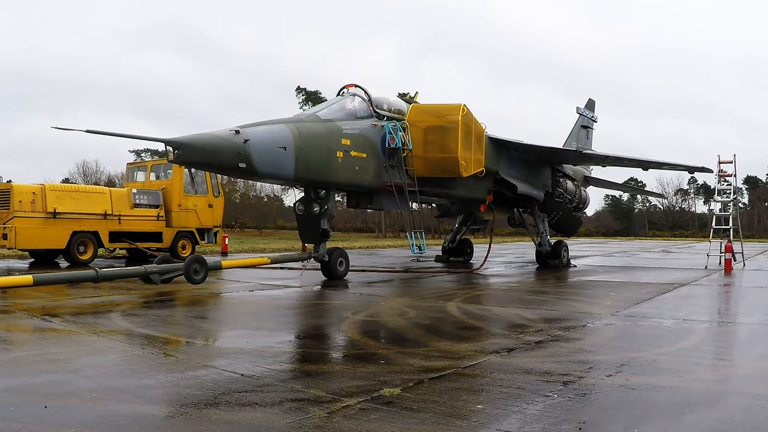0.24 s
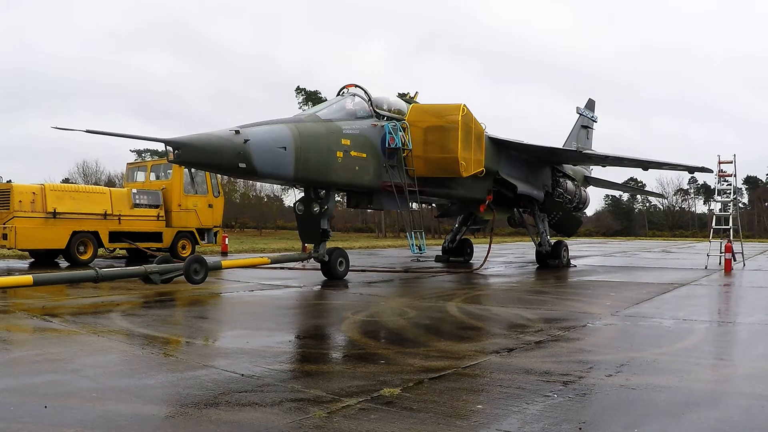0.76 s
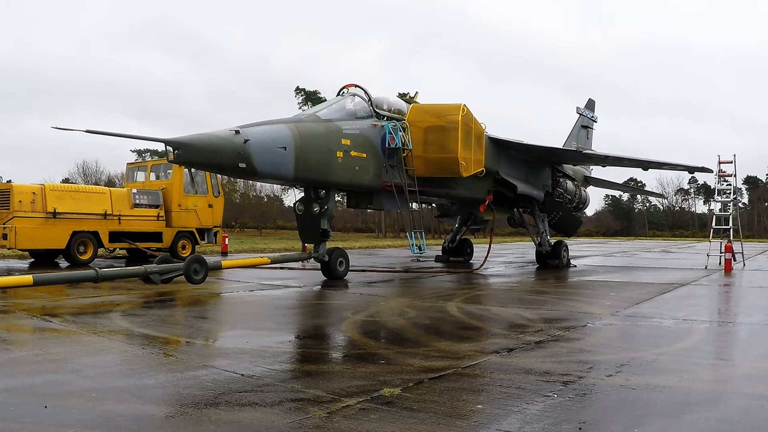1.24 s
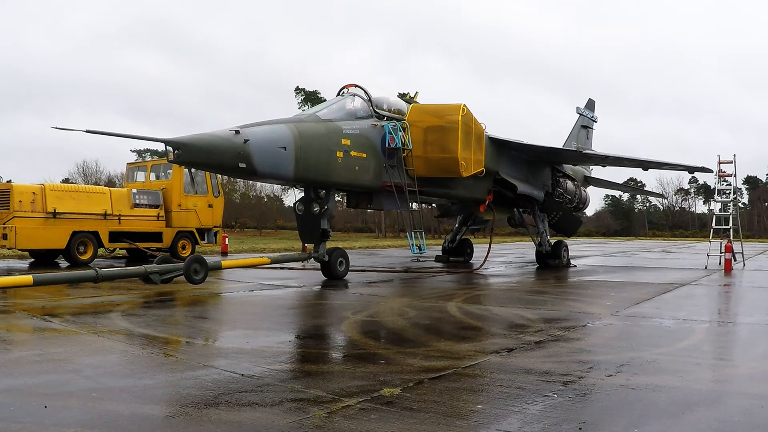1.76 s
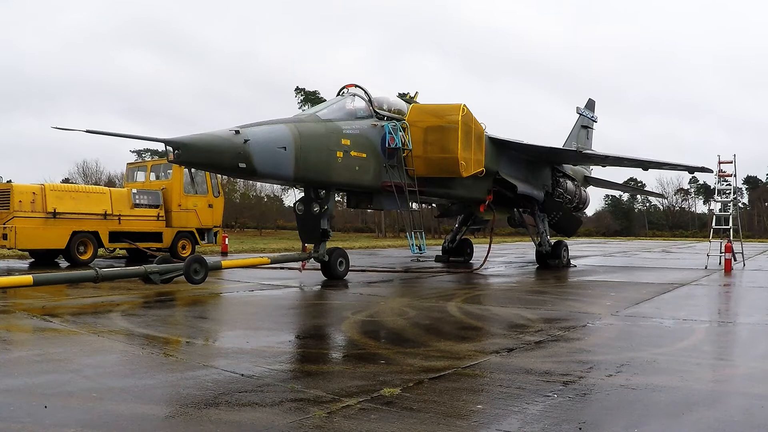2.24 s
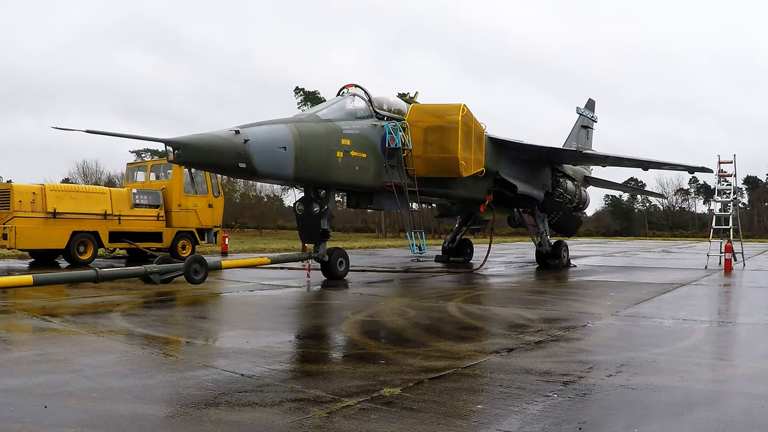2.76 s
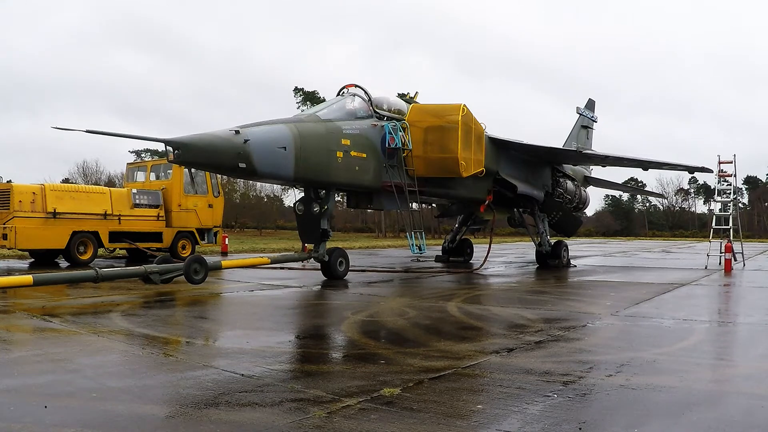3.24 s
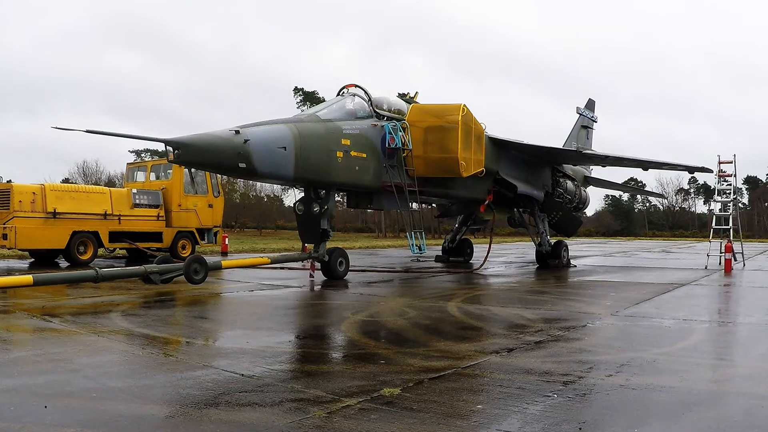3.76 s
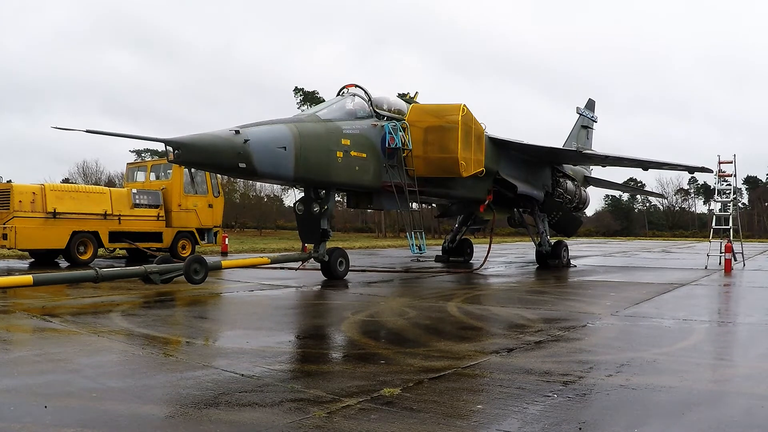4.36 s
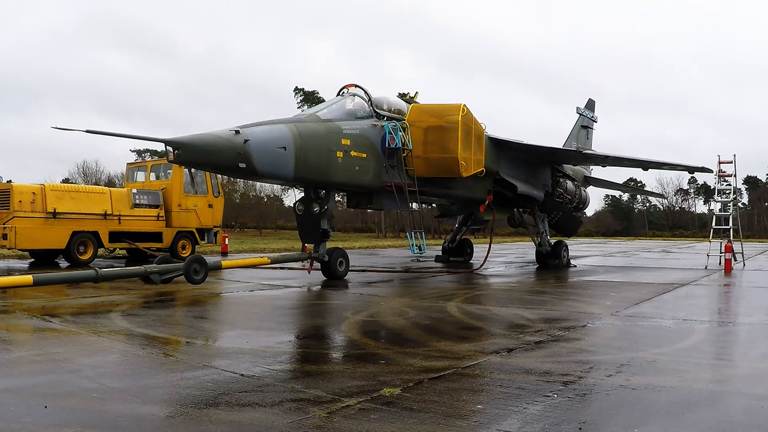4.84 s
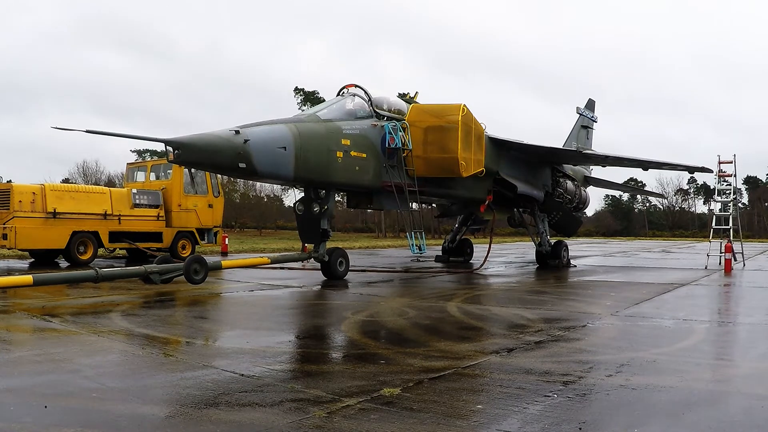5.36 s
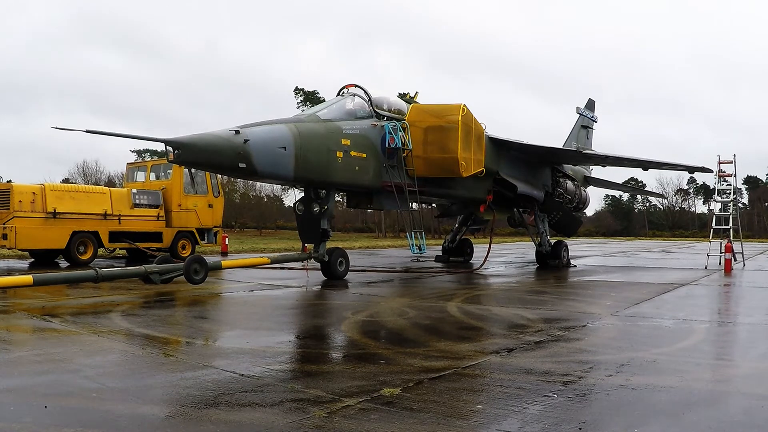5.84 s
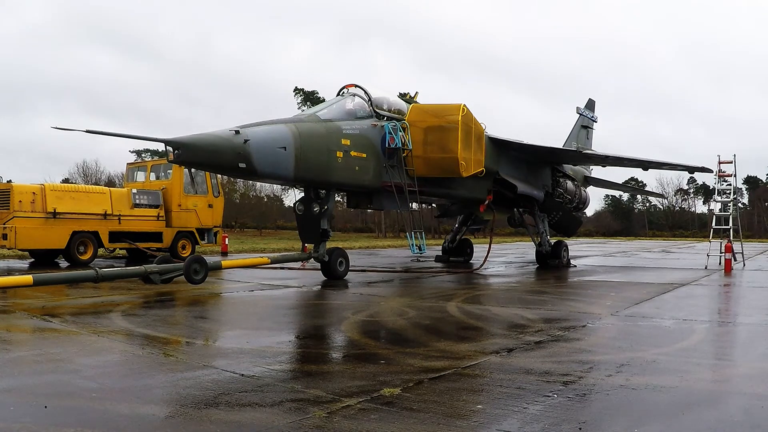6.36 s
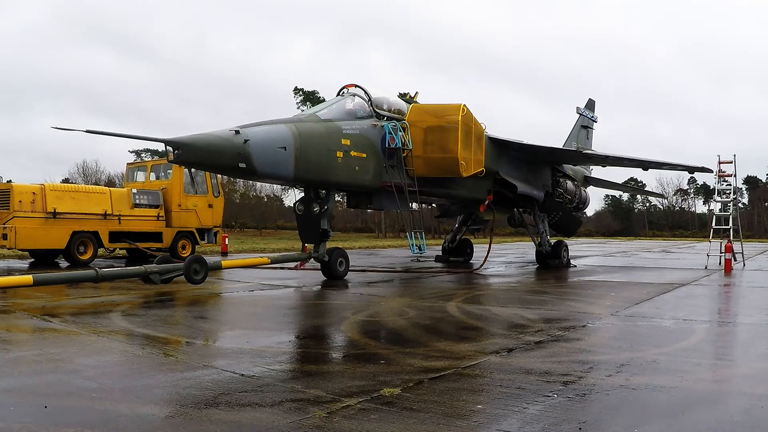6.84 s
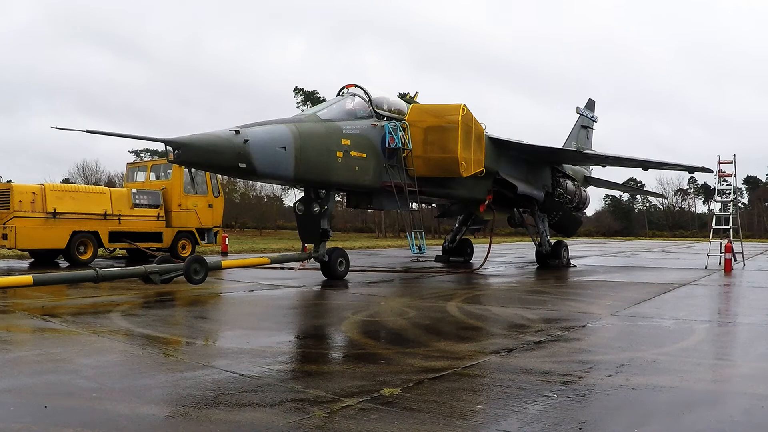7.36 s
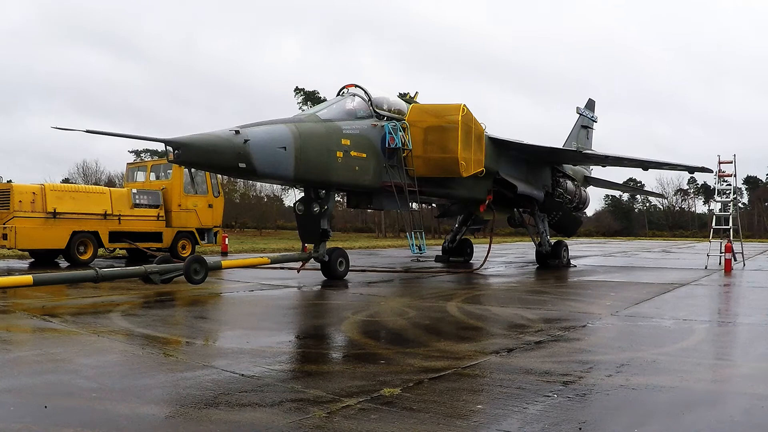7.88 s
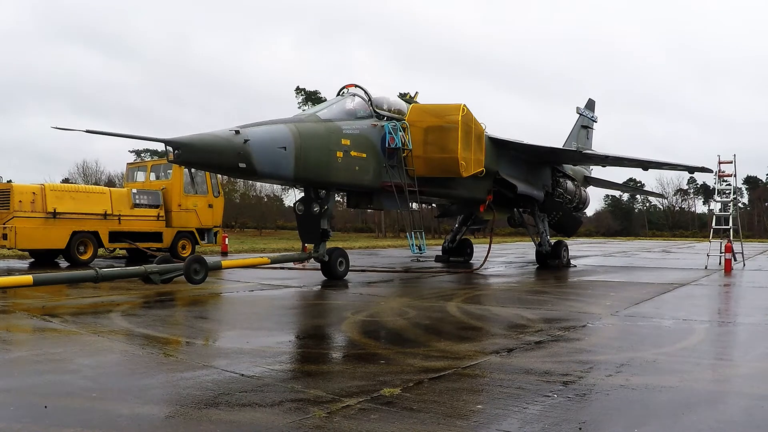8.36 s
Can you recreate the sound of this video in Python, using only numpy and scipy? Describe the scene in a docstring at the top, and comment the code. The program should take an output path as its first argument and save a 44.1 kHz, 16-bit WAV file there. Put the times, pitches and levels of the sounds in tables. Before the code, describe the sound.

A parked jet fighter starts its engine on open concrete. A shrill whistle, already high, climbs with quick flutters and flares over rushing air and a steady diesel ground power hum. After about three seconds deep booms surge irregularly; the whistle levels briefly, then rises faster as a broad roar swells. One fixed outdoor microphone, mono, little echo.

```python
"""Jet engine start on the apron

A jet engine winds up on open concrete while a diesel ground power unit runs beside it.
Blade rows whistle at fixed multiples of the shaft speed, fading in the moving air.
Flame noise drives a low boom in the jet pipe, with rumble below, flutter above and brief surges.
Air rushes through the ducts, coloured by resonances, and a roar grows over it."""
import sys
import numpy as np
from scipy import signal
from scipy.fft import rfft, irfft, next_fast_len
from scipy.io import wavfile

SR = 44100
rng = np.random.default_rng(int(sys.argv[2]) if len(sys.argv) > 2 else 0)


def digitize_waveform(pressure):
    """Quantize a signal to 16-bit integers and store it at the path in sys.argv[1].

    Rows of a 2-D input are taken as channels; values are limited to [-1, 1].
    """
    field = np.atleast_2d(pressure).T
    bounded = np.clip(field, -1, 1)
    quanta = np.round(bounded * 32767).astype(np.int16)
    wavfile.write(sys.argv[1], SR, quanta)


N = 379701  # samples


def undb(db):
    """Decibels to amplitude gain."""
    return 10 ** (np.asarray(db) / 20)


def curves(table):
    """The columns of a table, after its time column, as one value a sample."""
    s, *columns = np.transpose(table)
    return [np.interp(np.arange(N) / SR, s, c) for c in columns]


def noise(gain):
    """Noise of unit power per Hz, weighted by gain(Hz)."""
    size = next_fast_len(N, real=True)
    hz = np.arange(size // 2 + 1) * SR / size
    spectrum = rfft(rng.standard_normal(size)) * gain(hz)
    return irfft(spectrum, size)[:N] * np.sqrt(SR / 2)


def walk(rate):
    """Smooth random curve of about unit spread, up to rate changes a second."""
    count = int(N / SR * rate * 2) + 4
    steps = np.random.default_rng(rng.integers(2 ** 31)).standard_normal(count)
    smooth = signal.resample(steps, count * 8)
    # two steps per change, eight points per step
    return np.interp(np.arange(N) / SR * rate * 16, np.arange(len(smooth)), smooth)


def coloured(spectrum, resonances=()):
    """Noise with a broad spectrum and bell-shaped peaks and hollows on it."""
    points, db = np.transpose(spectrum)

    def gain(hz):
        broad_db = np.interp(np.log(hz + 1), np.log(points), db)
        bells_db = sum(d * .5 ** ((2 * (hz - f) / w) ** 2) for f, w, d in resonances)
        return undb(broad_db + bells_db)
    return noise(gain)


def turn(hz):
    """Unit phasor that follows a pitch curve."""
    return np.exp(2j * np.pi * np.cumsum(hz) / SR)


def scatter(width_hz, slope):
    """Complex envelope of unit power that spreads a tone into skirts."""
    a, b = (noise(lambda hz: (1 + (hz / width_hz) ** 2) ** (-slope / 2)) for _ in range(2))
    return (a / a.std() + 1j * b / b.std()) / np.sqrt(2)


def tone(hz, envelope):
    """A tone with the rms of its complex envelope."""
    return np.sqrt(2) * np.real(turn(hz) * envelope)


def swells(events, attack_s, release_s):
    """Gain of (start, length, dB) events that each swell up to the start, hold and die away."""
    t = np.arange(N) / SR
    gains = []
    for start, length, db in events:
        rise = np.minimum(t - start, 0) / attack_s
        fall = np.maximum(t - start - length, 0) / release_s
        gains.append(undb(db) * np.exp(rise - fall))
    return np.max(gains, axis=0)


def power_unit():
    """A diesel hums on near-steady multiples of its cycle; generator and turbocharger sing above it."""
    # strong partials of the diesel: multiple of the cycle rate, level/dB
    diesel_partials = [(2, -50), (3, -63), (4, -62), (5, -65), (6, -49.5), (7, -55), (8, -48.5), (9, -55.5),
                       (11, -62), (12, -50), (14, -62.5), (15, -62.5), (16, -65), (20, -59.5), (21, -62),
                       (22, -56.5), (24, -68), (25, -63), (28, -66.5), (30, -69), (32, -62), (33, -66),
                       (38, -68)]
    # generator and turbocharger tones: f/Hz, level/dB, pitch wander/Hz
    singing_tones = [(725, -60.5, .4), (1449, -58.5, 1.5), (2292, -56, 14), (7538, -52, 8)]
    cycle_hz = 20.46
    cycle = turn(cycle_hz * (1 + 0.0006 * walk(2)))
    strong = {int(round(k)): db for k, db in diesel_partials}
    hum, partial = 0, cycle
    for k in range(2, 56):
        partial = partial * cycle
        # unequal cylinders fill in the weak multiples, fading upwards
        db = strong.get(k, -65 - 0.23 * k)
        start_phase = np.exp(2j * np.pi * rng.random())
        hum = hum + undb(db + 1.34 * walk(3)) * np.real(partial * start_phase)
    sing = sum(tone(hz + wander * walk(8), undb(db + 1.5 * walk(7)))
               for hz, db, wander in singing_tones)
    return np.sqrt(2) * hum + sing


def intake(hz):
    """Gain with which the intake radiates an upper blade tone sweeping through its resonance."""
    # radiation of the intake: f/Hz, level/dB
    radiation = [(9000, -21), (10100, -10), (10950, -16), (11250, -9), (11600, -2), (12100, 2),
                 (12900, -2.5), (13600, -1.5), (14400, -1.5), (15000, -3.5), (15400, 0)]
    return undb(np.interp(hz, *np.transpose(radiation)))


def compressor(breeze):
    """Blade tones; eddies on the way make them fade and give them noisy skirts."""
    # compressor speed: t/s, blade-passing pitch of the first row f/Hz
    spool = [(0.0, 4484), (0.54, 4688), (1.05, 4905), (2.11, 5331), (2.61, 5519), (3.3, 5762), (3.97, 5942),
             (4.38, 6014), (5.25, 6049), (5.52, 6096), (5.94, 6171), (6.48, 6407), (7.02, 6916),
             (7.56, 7594), (8.1, 8337), (8.6, 8818)]
    # whistle of the first row before fades and flares: t/s, level/dB
    whistle = [(0, -37), (.7, -33), (1.9, -34), (2.15, -38.5), (2.6, -38), (3.08, -40.5), (3.2, -42.5),
               (3.9, -44), (4.7, -39.5), (5.5, -38), (6.2, -35), (7.25, -33.5), (7.85, -29.5), (8.0, -37.5),
               (8.6, -41)]
    # flares where the moving air focuses the whistle: start t/s, length t/s, level/dB
    flares = [(.19, 0.035, -28.5), (.38, 0.04, -33), (.88, 0.041, -29), (1.14, 0.034, -24),
              (1.27, 0.06, -27.5), (1.57, 0.016, -24), (1.67, 0.027, -25), (1.76, 0.065, -23),
              (1.89, .04, -23.5), (2.07, 0.017, -26), (4.13, 0.048, -32.5), (4.3, 0.061, -40),
              (4.57, 0.012, -27.5), (4.73, 0.022, -30.5), (4.88, 0.047, -35), (5.04, 0.038, -34.5),
              (6.25, 0.075, -32.5), (6.38, 0.021, -33), (7.44, 0.077, -27.5), (7.81, 0.065, -27.5)]
    fade_share, fades_per_s = 0.21, 23
    flicker_db, flickers_per_s, skirt_db = 1.2, 53, -8
    octave_db, second_row_db, third_row_db = -46, -40, -48.5  # where the intake gain is 0 dB
    rear_db_per_khz = -4.1  # the rear rows run smoother as the first row's pitch rises

    hz, = curves(spool)
    front_db, = curves(whistle)
    steady_gain = undb(front_db)
    octave_hz = hz * 2
    second_hz, third_hz = hz * 70 / 28, hz * 80 / 28  # ratios of the blade counts

    faded = steady_gain * (1 + fade_share * walk(fades_per_s))
    front_gain = np.hypot(faded, swells(flares, attack_s=0.021, release_s=0.021))
    # rays bent by eddies add to the direct one and chop the tone into quick flutter
    bent = 0.85 + 0.46 * scatter(42, slope=4)
    direct = front_gain * bent * undb(flicker_db * walk(flickers_per_s))
    # widely scattered rays come by many paths and fade less
    skirts = np.sqrt(front_gain * steady_gain) * undb(skirt_db) * scatter(78, slope=1.57)
    front = tone(hz, direct + skirts)

    octave_gain = intake(octave_hz) * undb(octave_db + 1.14 * breeze)
    octave = tone(octave_hz, scatter(23, slope=1.33)) * octave_gain
    # the rear rows cut through the wakes of the front ones, so their tones are hoarse
    second = tone(second_hz, scatter(70, slope=1.0)) * intake(second_hz) * undb(second_row_db)
    third = tone(third_hz, scatter(90, slope=1.2)) * intake(third_hz) * undb(third_row_db)
    rise_khz = (hz - hz[0]) / 1000
    rear_db = rear_db_per_khz * rise_khz + 1.3 * breeze + 1.2 * walk(4.3)
    return front + octave + (second + third) * undb(rear_db)


def airflow(breeze):
    """A steady rush of air and the roar that grows over it; the treble flutters in the breeze."""
    # airflow over time, relative to the spectra below: t/s, rush level/dB, roar level/dB
    flow = [(0, -1, -28), (3, .5, -21), (4, 0.1, -12.5), (6, 1, -17), (6.6, 1.1, -7), (7.27, -1.5, -5),
            (8.1, -2.5, -0.2), (8.6, -5, -1.5)]
    # noise spectra before the flow levels: f/Hz, level/dB per Hz
    rush_spectrum = [(20, -79), (100, -68), (180, -72.5), (300, -80), (430, -75.5), (600, -83.5),
                     (900, -85.5), (1300, -86), (1700, -76.5), (3200, -75), (4300, -75.5), (7700, -80.5),
                     (8600, -86.5), (15000, -99)]
    roar_spectrum = [(20, -51), (150, -71), (450, -71.5), (900, -77.5), (1700, -74.5), (2400, -71),
                     (4200, -69.5), (5500, -75.5), (7800, -76.5), (9000, -85), (12000, -90), (15000, -89)]
    # colour of ducts, airframe and concrete: f/Hz, width/Hz, level/dB
    duct_colour = [(1160, 41, 4.5), (1416, 90, -3), (1630, 27, 1), (2270, 217, 10), (2598, 47, -14),
                   (2900, 88, -2), (3075, 91, 6), (3282, 146, 6.5), (3316, 79, -2.5), (3735, 80, 5),
                   (3843, 152, -10), (4110, 600, 4.5), (4760, 390, -4.5), (5750, 370, -3),
                   (6760, 290, -1.5), (8300, 300, 1), (10700, 730, -4), (12130, 940, 10.5)]
    # resonances that the fast flow adds: f/Hz, width/Hz, level/dB
    pipe_colour = [(480, 200, 3.5), (1104, 68, 5.5), (1377, 86, -10), (1698, 110, 11), (1990, 25, 10),
                   (2630, 240, 6), (4090, 160, -6.5)]
    # gusts of the roar, relative to its spectrum: start t/s, length t/s, level/dB
    gusts = [(7.36, 0.23, -4.5), (7.78, .1, -7), (8.27, .33, -3.5)]

    rush_db, roar_db = curves(flow)
    rush = coloured(rush_spectrum, duct_colour) * undb(rush_db + 0.073 * walk(5.4))
    # one narrow mode of the jet pipe howls in loose bursts
    howl = tone(1692, scatter(22, slope=1.7)) * undb(-49 + 3 * walk(2.6))
    roar_gain = np.hypot(undb(roar_db), swells(gusts, attack_s=0.034, release_s=0.12))
    roar_noise = coloured(roar_spectrum, duct_colour + pipe_colour)
    roar = (roar_noise + howl) * roar_gain * undb(0.32 * walk(10))
    air = rush + roar
    high_pass = signal.butter(2, 4500, "high", fs=SR, output="sos")
    treble = signal.sosfiltfilt(high_pass, air)
    return air + treble * (undb(0.85 * breeze) - 1)


def flame():
    """Burning gas drives the lowest resonance of the jet pipe, with rumble below and flutter above."""
    # steady burning: t/s, burn level/dB (shared out below), flutter level/dB
    burning = [(0, -42, -50), (1.25, -35.5, -53), (1.4, -41.5, -50), (2.68, -42, -55), (2.75, -33.5, -45.5),
               (4.5, -28.5, -36), (7.3, -32.5, -40), (8.6, -32.5, -42)]
    # surges of the flame: start t/s, length t/s, boom level/dB, flutter level/dB
    surges = [(3.09, .15, -34, -56), (3.473, 0.033, -28, -45), (3.667, 0.26, -17.5, -40),
              (4.036, 0.16, -15, -26), (4.314, 0.16, -24, -40), (4.86, 0.11, -21.5, -34),
              (5.19, .33, -16, -37), (5.56, 0.08, -19.5, -43), (5.904, .1, -22.5, -48),
              (6.2, 0.11, -21.5, -41), (6.4, 0.091, -22.5, -54), (6.586, 0.1, -17.5, -34.5),
              (6.82, .04, -32, -32), (7.05, 0.12, -21, -32), (7.33, 0.17, -32.5, -40),
              (7.81, 0.04, -22, -32.5), (8.09, 0.06, -27, -40), (8.3, 0.24, -24.5, -42)]
    # deep rumble, relative to the burn level and rumble_db: f/Hz, level/dB per Hz
    rumble_spectrum = [(6, -42), (14, -20), (22, -37), (32, -14), (40, -12.5), (55, -10), (80, -46),
                       (200, -63.5)]
    # flutter, relative to its level over time: f/Hz, level/dB per Hz
    flutter_spectrum = [(30, -35), (55, -6), (68, -15), (80, -15), (92, -20.5), (105, -22.5), (140, -48),
                        (200, -35), (300, -65), (1000, -94)]
    boom_hz = 53.15  # lowest resonance of the jet pipe, before its wander
    attack_s, release_s = 0.052, 0.044
    throb_db, throbs_per_s = 1.2, 14
    sputter_share, sputter_hz = 0.44, 10.5
    rumble_db = -6.5

    burn, steady_flutter = undb(curves(burning))
    start, length, boom_db, flutter_db = np.transpose(surges)
    boom_surges = swells(zip(start, length, boom_db), attack_s, release_s)
    flutter_surges = swells(zip(start, length, flutter_db), attack_s, release_s)
    boom_gain = np.hypot(0.68 * burn, boom_surges)
    flutter_gain = np.hypot(steady_flutter, flutter_surges)

    throbbing = boom_gain * undb(throb_db * walk(throbs_per_s))
    sputter = sputter_share * burn * scatter(sputter_hz, slope=2.6)
    boom = tone(boom_hz + 0.91 * walk(4), throbbing + sputter)
    rumble = coloured(rumble_spectrum) * burn * undb(rumble_db)
    flutter = coloured(flutter_spectrum) * flutter_gain
    return boom + rumble + flutter


def scene():
    """All sources, heard from one spot on the apron; one breeze stirs the blade tones and the air."""
    breeze = 0.78 * walk(9) + 0.57 * walk(28)
    mix = power_unit() + compressor(breeze) + airflow(breeze) + flame()
    return mix[None]  # one microphone channel


def record(dry):
    """A steep low-pass after the microphone cuts the top of the treble."""
    top_hz = 15300
    low_pass = signal.ellip(12, .1, 90, top_hz, fs=SR, output="sos")
    return signal.sosfilt(low_pass, dry)


dry = scene()
out = record(dry)
digitize_waveform(out)
```